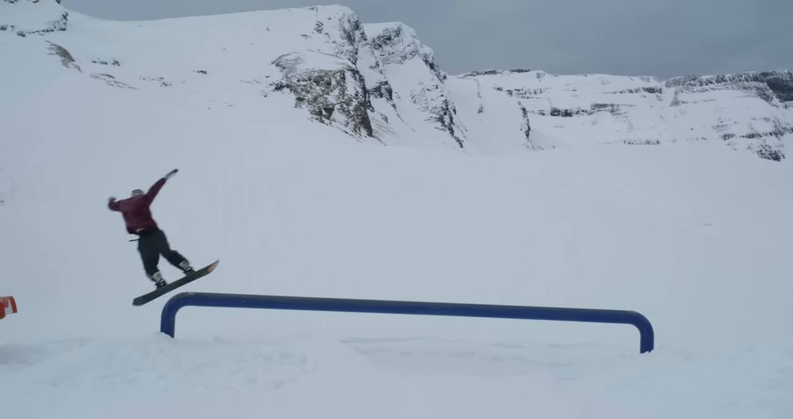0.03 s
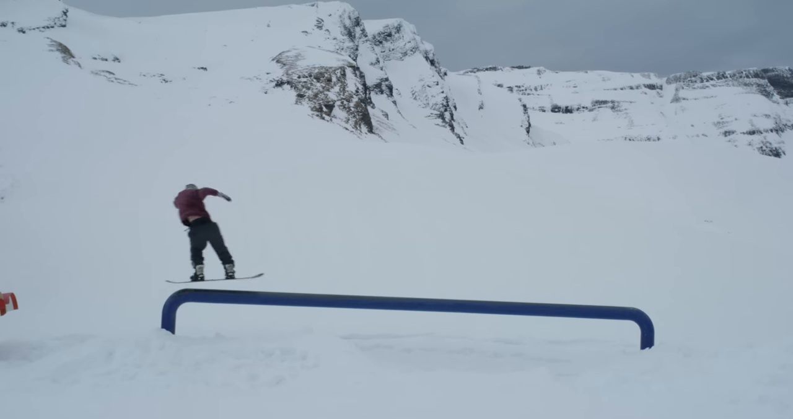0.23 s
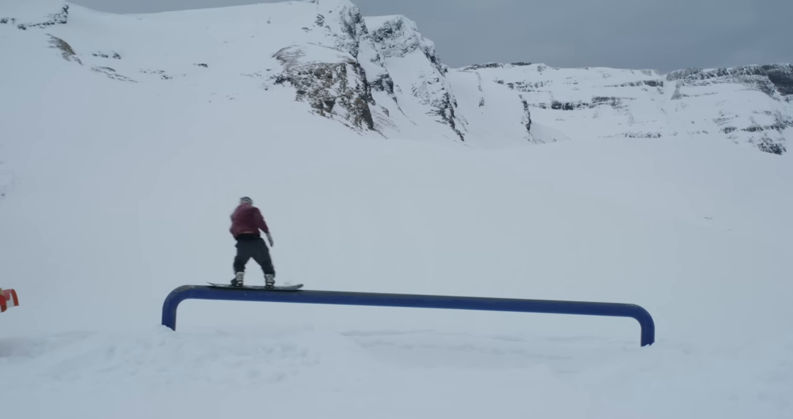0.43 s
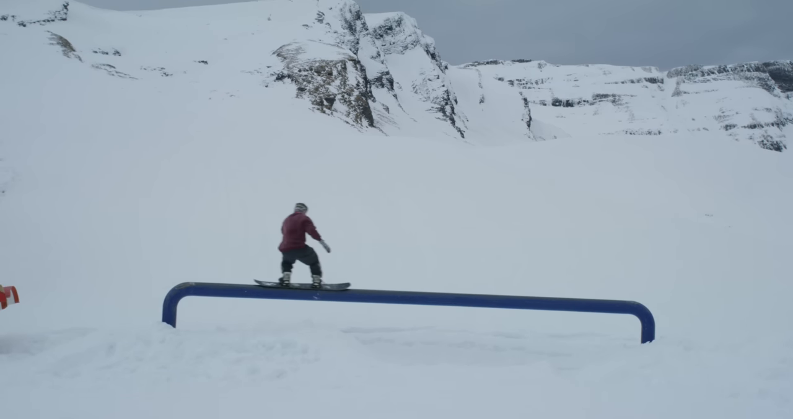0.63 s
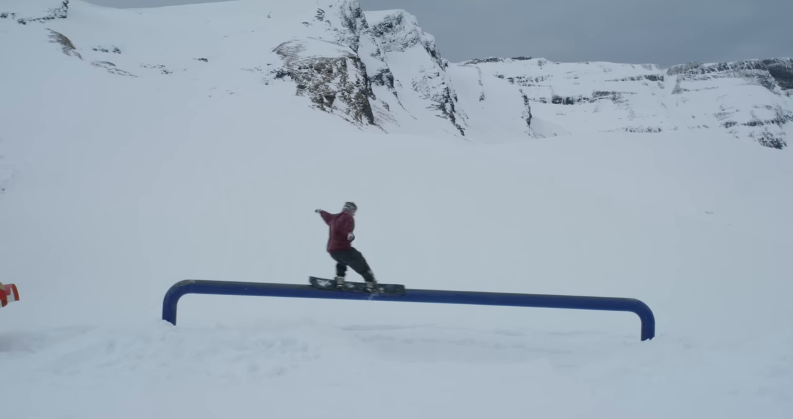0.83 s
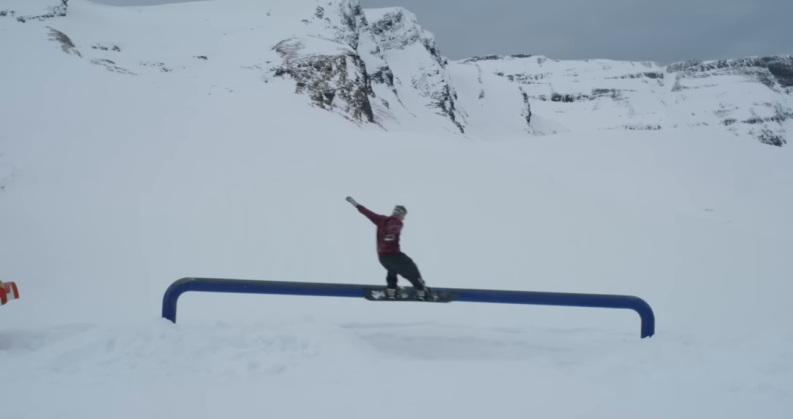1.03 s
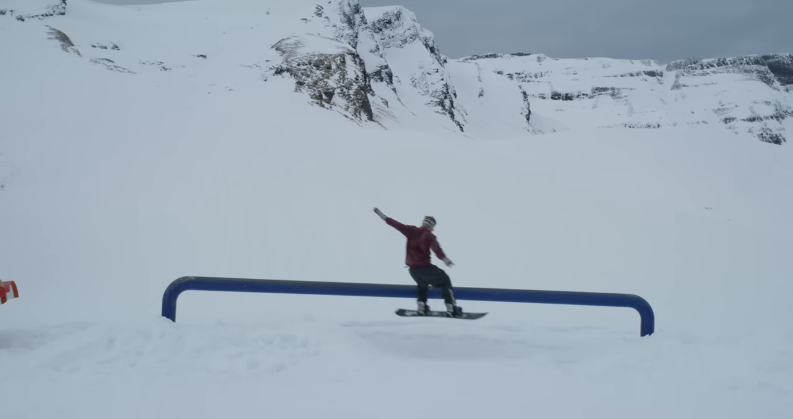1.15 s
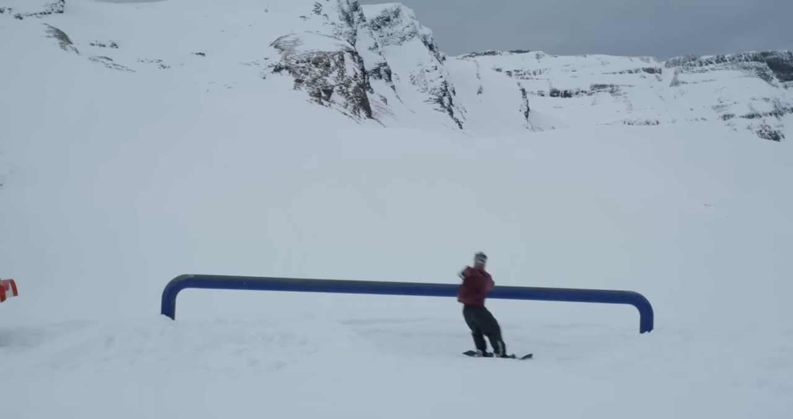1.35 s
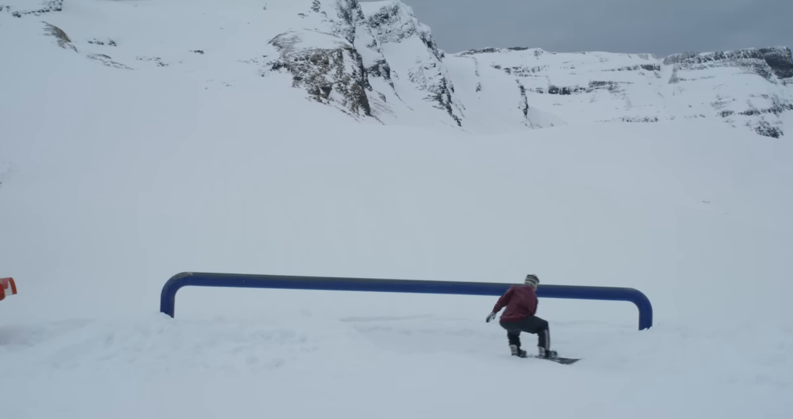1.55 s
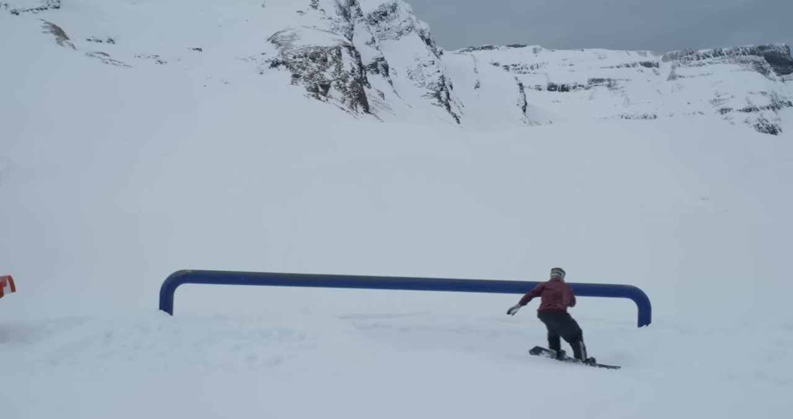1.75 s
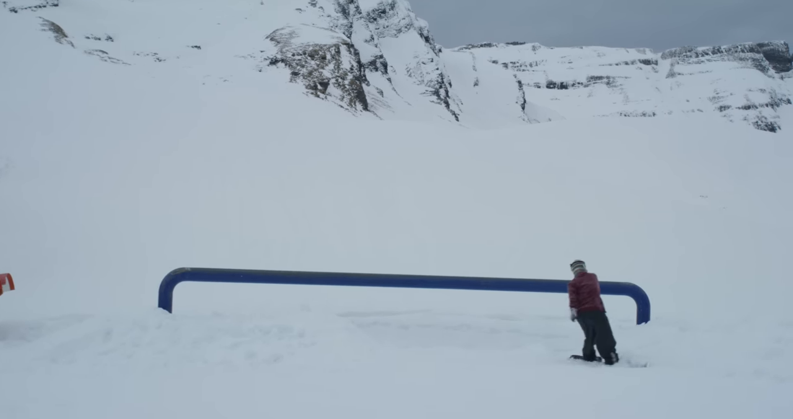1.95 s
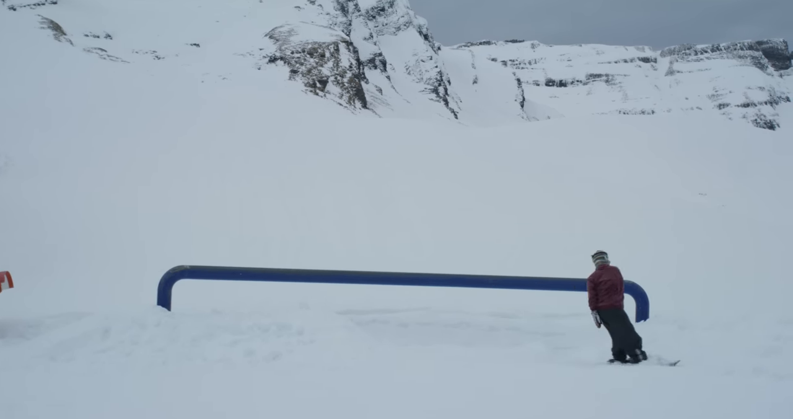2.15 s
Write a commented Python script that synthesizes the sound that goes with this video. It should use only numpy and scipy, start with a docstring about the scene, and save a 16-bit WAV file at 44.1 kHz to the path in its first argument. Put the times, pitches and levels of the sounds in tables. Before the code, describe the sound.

Hard metallic clank of a snowboard hitting a pipe rail, brief scrape, crunchy snow landing, low wind rumble

```python
"""Wind rumbles on the microphone throughout, as shaped noise with gusts, deep buffets and a faint hiss.
A snowboard clips a steel pipe rail and slams onto it: its modes clack, noise cracks and an echo returns.
The pipe rings in tones that bloom late, sink slightly in pitch and beat; the base slaps down and scrapes along.
The edge scuffs off the rail's end in bursts of grains, then the board lands and glides away
in crunching, spraying snow made of dense clicks."""
import sys
import numpy as np
from scipy import signal
from scipy.fft import rfft, irfft
from scipy.io import wavfile
from scipy.ndimage import uniform_filter1d

SR = 44100
rng = np.random.default_rng(int(sys.argv[2]) if len(sys.argv) > 2 else 0)


def digitize_waveform(pressure):
    """Quantize a signal to 16-bit integers and store it at the path in sys.argv[1].

    Rows of a 2-D input are taken as channels; values are limited to [-1, 1].
    """
    field = np.atleast_2d(pressure).T
    bounded = np.clip(field, -1, 1)
    quanta = np.round(bounded * 32767).astype(np.int16)
    wavfile.write(sys.argv[1], SR, quanta)


N = 97020

# blows of board on rail: t/s, relative clack level/dB, relative crack level/dB
BLOWS = [(0.3753, -15.5, -8), (0.3782, -15, -19), (.3877, -34, -11), (0.4273, -11, -38), (0.431, -5, 5),
         (0.4373, 2.5, 2.5), (0.4426, -8, 7.5), (0.4738, -15, -11.5), (.6, -40, -23.5)]


def undb(db):
    """Decibels to gain."""
    return 10 ** (np.asarray(db) / 20)


def clock():
    """Time of every sample in seconds."""
    return np.arange(N) / SR


def curve(rows, axis=1):
    """Gain from one dB column of a time table, silent outside it."""
    rows = np.array(rows)
    level_db = np.interp(clock(), rows[:, 0], rows[:, axis], left=-np.inf, right=-np.inf)
    return undb(level_db)


def fade(t60):
    """Exponential decay that falls 60 dB in t60 seconds."""
    return np.exp(-np.log(1000) * clock() / max(t60, 1e-3))


def delay(x, s):
    """The same sound s seconds later."""
    silence = np.zeros(max(int(s * SR), 0))
    return np.concatenate([silence, x])[:N]


def ring(x, response):
    """Play a drive through a response."""
    return signal.fftconvolve(x, response)[:N]


def colour(x, points):
    """Causal minimum-phase filter of unit power that follows (f/Hz, level/dB) points."""
    hz, db = np.array(points).T
    size = 8192
    bin_hz = np.arange(size // 2 + 1) * SR / size
    gain = undb(np.interp(np.log(bin_hz + 1), np.log(hz), db))
    # fold the cepstrum forward in time so that the response starts at once
    cepstrum = irfft(np.log(gain))
    cepstrum[1:size // 2] *= 2
    cepstrum[size // 2 + 1:] = 0
    response = irfft(np.exp(rfft(cepstrum)))
    return ring(x, response / np.linalg.norm(response))


def walk(rate):
    """Smoothed noise with a spread of 1; a higher rate in Hz wanders faster."""
    width = max(int(SR / rate), 1)
    smooth = uniform_filter1d(rng.standard_normal(N), width)
    smooth = uniform_filter1d(smooth, width)
    return smooth / smooth.std()


def grains(rate, spread_db):
    """Random clicks of uneven size, about rate per second, scaled to a spread of 1."""
    hits = rng.random(N) < rate / SR
    sizes = rng.standard_normal(N)
    boost = undb(spread_db * np.minimum(rng.exponential(size=N), 5))
    clicks = hits * sizes * boost
    return clicks / clicks.std()


def wind():
    """Gusts and deep buffets press on the microphone as low noise, over a faint steady hiss."""
    # wind strength: t/s, level/dB
    gusts = [(0, -46.5), (.205, -46), (.235, -38), (.28, -37.5), (.4, -39.5), (.5, -41.5), (.61, -45),
             (.75, -53), (.87, -52.5), (1.05, -49), (1.25, -44), (1.45, -44), (1.6, -39.5), (1.85, -43.5),
             (2.12, -44), (2.2, -46)]
    # spectrum of the rumble: f/Hz, relative level/dB
    rumble_colour = [(15, -10.5), (30, -13), (65, -2), (130, -3), (210, -9.5), (320, -18.5), (500, -26.5),
                     (1000, -47), (3000, -79)]
    # single deep buffets: t/s, level/dB
    buffet_peaks = [(.245, -32), (.605, -42.5), (.69, -45), (0.811, -45.5), (1.35, -41)]
    # spectrum of a buffet: f/Hz, relative level/dB
    buffet_colour = [(15, -22), (40, -5), (75, 3.5), (120, -14), (250, -42), (600, -71)]
    # spectrum of the hiss: f/Hz, relative level/dB
    hiss_colour = [(300, -5), (1000, 5), (2500, -5), (6000, -11.5), (9800, -16), (11100, -7.5),
                   (12300, -13), (15500, -9.5)]
    buffet_s, hiss_db = 0.02, -70  # buffet half-width at 1/e, hiss level

    flutter = undb(1.1 * walk(rate=31))
    rumble = curve(gusts) * flutter * colour(rng.standard_normal(N), rumble_colour)
    swell = sum(undb(db) * np.exp(-((clock() - s) / buffet_s) ** 2) for s, db in buffet_peaks)
    buffets = swell * colour(rng.standard_normal(N), buffet_colour)
    hiss = undb(hiss_db) * colour(rng.standard_normal(N), hiss_colour)
    return rumble + buffets + hiss


def snow():
    """Packed snow crunches under the landing in dense clicks; the edge throws a finer, brighter spray."""
    # board in snow: t/s, crunch level/dB, spray level/dB
    contact = [(1.368, -69.5, -86), (1.382, -48, -64), (1.41, -48.5, -64), (1.44, -51.5, -62),
               (1.47, -57, -66.5), (1.51, -55.5, -64.5), (1.63, -57, -68), (1.69, -55, -68.5),
               (1.76, -57.5, -72), (1.92, -56, -60.5), (2.04, -62, -62.5), (2.1, -62.5, -66),
               (2.2, -62, -70.5)]
    # spectrum of the crunch: f/Hz, relative level/dB
    crunch_colour = [(200, 5), (500, 1), (1200, -8), (2400, -7), (3600, -0.5), (4600, -18), (7000, -18),
                     (10000, -38), (15500, -34)]
    # spectrum of the spray: f/Hz, relative level/dB
    spray_colour = [(1000, -17), (3500, 2.5), (5000, 0.5), (8000, -1.5), (11500, -6.5), (15500, -15.5)]

    crunch = curve(contact, axis=1) * colour(grains(rate=3500, spread_db=1.5), crunch_colour)
    spray = curve(contact, axis=2) * colour(grains(rate=20000, spread_db=0.0), spray_colour)
    return (crunch + spray) * undb(1.15 * walk(rate=52))


def scuffs():
    """The edge catches and rips out short bursts of bright grains."""
    # scuffs off the rail's end, then through crusts of snow: t/s, relative level/dB, t60/s
    catches = [(1.1005, -39.5, 0.057), (1.109, -43.5, 0.02), (1.185, -53, 0.013), (1.301, -59.5, 0.025),
               (1.409, -49.5, 0.047), (1.457, -53.5, 0.096), (1.677, -50.5, 0.027), (1.757, -54, 0.037),
               (1.917, -57.5, .05)]
    # spectrum of a scuff: f/Hz, relative level/dB
    scuff_colour = [(200, -20), (500, -5.5), (1200, 2), (2500, -3.5), (3500, -2.5), (4500, -14.5),
                    (6500, -9), (9000, -21.5), (15500, -22)]
    attack_s = 0.002  # time constant of the onset

    onset = 1 - np.exp(-clock() / attack_s)
    envelope = sum(undb(db) * delay(onset * fade(t60), s) for s, db, t60 in catches)
    return 2 * colour(envelope * grains(rate=12000, spread_db=1.0), scuff_colour)


def slide():
    """The base catches and slips on the steel in tiny uneven jerks."""
    # scrape of the base along the rail: t/s, level/dB
    friction = [(.44, -35), (.48, -48), (.63, -56), (.74, -52.5), (.82, -52.5), (.86, -49.5), (.925, -47.5),
                (.95, -58), (1.0, -61), (1.04, -61), (1.07, -52.5), (1.1, -54.5), (1.125, -59),
                (1.16, -69.5), (1.3, -65.5), (1.36, -91)]
    # spectrum of the scrape: f/Hz, relative level/dB
    scrape_colour = [(200, -12.5), (600, -7), (1400, 2), (2400, -6.5), (3600, -7), (4600, -17.5),
                     (6500, -17.5), (10000, -26.5), (15500, -39)]

    unevenness = undb(0.73 * walk(rate=70))
    return curve(friction) * unevenness * colour(grains(rate=7000, spread_db=0.5), scrape_colour)


def slap():
    """A dull, woody knock of decaying noise as the whole base comes down flat after the slam."""
    # spectrum of the slap: f/Hz, relative level/dB
    slap_colour = [(200, -21), (400, 8), (700, -12.5), (1000, 0.5), (1350, 6), (1950, -1.5), (2500, -11),
                   (4000, -14.5), (6000, -39), (15000, -45)]
    slap_s, slap_db, slap_t60_s = 0.5508, -27, 0.046

    burst = fade(slap_t60_s) * rng.standard_normal(N)
    return undb(slap_db) * colour(delay(burst, slap_s), slap_colour)


def pipe(scrape):
    """Waves near a wall mode travel slowest, so tones bloom late and sink; the routes waver and beat together."""
    # pitches that the wall modes sink to: f/Hz
    mode_hz = [640, 1175, 1892, 2782, 3810, 5200, 6300, 7750]
    # ring of each wall mode: relative level/dB, t60/s of its exponential part, sag/(Hz s^2), width/Hz
    modes = [(-14.5, 1.42, .6, 77), (-2, 2.215, .82, 38.7), (-13, 1.21, .35, 110), (-2.5, 0.41, 0.298, 64),
             (-12, 0.39, 0.38, 230), (-24, 0.39, .3, 260), (-26, 0.28, 0.27, 250), (-24.5, 0.32, 0.33, 230)]
    # routes to and fro along the pipe: length relative to the shortest, relative level/dB
    routes = [(1, 0), (1.44, -10), (1.83, -4.5), (2.8, -4), (6.5, -13)]
    # jolts that set the pipe ringing: t/s, relative level/dB, brightness/(dB per octave from 1 kHz)
    jolts = [(0.378, -28, 6), (.44, 0.5, 0), (0.553, -25, -1.5), (1.106, -21.5, 0)]
    ring_db, slide_ring_db = -35, -18  # whole ring, and the share driven by the scrape
    waver_us, waver_rate = 45, 45  # spread of the timing in microseconds, wander in Hz

    t = clock() + 1 / SR
    struck, response = np.zeros(N), np.zeros(N)
    for hz, (db, t60, sag, width_hz) in zip(mode_hz, modes):
        tone = np.zeros(N)
        for length, route_db in routes:
            # early waves lie far above the mode and are weak
            above_hz = sag * length ** 2 / t ** 2
            bloom = np.exp(-above_hz / width_hz)
            wavering = t + waver_us * 1e-6 * walk(rate=waver_rate)
            # as a phase, this minus sign makes a pitch that sinks to hz from above
            tone += undb(route_db) * bloom * np.sin(2 * np.pi * (hz - above_hz) * wavering)
        tone *= undb(db) * fade(t60) / np.sqrt(t)  # the wave also spreads out in time
        response += tone
        octaves = np.log2(hz / 1000)
        struck += sum(undb(jolt_db + bright_db * octaves) * delay(tone, s) for s, jolt_db, bright_db in jolts)
    scraped = undb(slide_ring_db) * ring(scrape, response)
    return undb(ring_db) * (struck + scraped)


def clack():
    """Each blow adds energy to the board's modes, which ring on as decaying sines."""
    # pitches of the board's modes: f/Hz
    mode_hz = [402, 570, 654, 725, 766, 812, 833, 883, 940, 1016, 1130, 1263, 1382, 1470, 1880, 2045, 2440,
               2797, 3026, 3178, 3590]
    # ring of each mode: relative level/dB, t60/s
    modes = [(-4.5, 0.084), (-11, 0.095), (-6, 0.06), (-6, .11), (-6.5, 0.1), (-7, 0.126), (-28, 0.44),
             (-4.5, .16), (-14, .16), (1, 0.12), (-10, 0.29), (-7.5, 0.25), (-11.5, .12), (-12, 0.34),
             (-7.5, 0.085), (-15, 0.1), (-2, 0.024), (-1, 0.033), (-7.5, 0.21), (-15, 0.043),
             (-25.5, 0.032)]
    clack_db = -23.5  # level of the whole clack

    body = np.zeros(N)
    for hz, (db, t60) in zip(mode_hz, modes):
        decay = fade(t60)
        energy = sum(delay((undb(blow_db) * decay) ** 2, s) for s, blow_db, _ in BLOWS)
        envelope = uniform_filter1d(np.sqrt(energy), size=24)  # soften the onsets
        body += undb(db) * envelope * np.sin(2 * np.pi * (hz * clock() + rng.random()))
    return undb(clack_db) * body


def crack():
    """Each blow bursts into short coloured noise with a quieter, longer tail."""
    # spectrum of the crack: f/Hz, relative level/dB
    crack_colour = [(150, -26.5), (350, -2), (900, 9), (1700, -4), (3300, -1.5), (4800, -19), (7200, -17.5),
                    (10000, -30), (15500, -39)]
    crack_db, crack_t60_s = -16.5, 0.018
    tail_db, tail_t60_s = -21.5, 0.28  # tail level relative to the crack

    shape = fade(crack_t60_s) + undb(tail_db) * fade(tail_t60_s)
    bursts = sum(undb(db) * delay(shape * rng.standard_normal(N), s) for s, _, db in BLOWS)
    return undb(crack_db) * colour(bursts, crack_colour)


def clank():
    """Clack and crack sound together, and the pipe's end sends them back duller and smeared."""
    echo_s, echo_db, echo_hz, echo_t60_s = 0.036, -11.5, 1600, 0.13  # delay, level, lowpass, smear

    direct = clack() + crack()
    dull = signal.sosfilt(signal.butter(2, echo_hz, fs=SR, output="sos"), direct)
    smear = fade(echo_t60_s) * rng.standard_normal(N)
    echo = ring(dull, smear / np.linalg.norm(smear))
    return direct + undb(echo_db) * delay(echo, echo_s)


def scene():
    """Blows and scrape both ring the pipe; snow and wind lie around them."""
    scrape = slide()
    surroundings = wind() + snow()
    board_on_rail = scuffs() + scrape + slap() + pipe(scrape) + clank()
    return (surroundings + board_on_rail)[None]


def record(dry):
    """The recorder rounds the tallest peaks and cuts the top."""
    ceiling, top_hz = 0.55, 16000  # full-scale fraction, cutoff in Hz
    rounded = dry / (1 + (dry / ceiling) ** 4) ** 0.25
    return signal.sosfilt(signal.ellip(10, 0.2, 70, top_hz, fs=SR, output="sos"), rounded)


dry = scene()
out = record(dry)
digitize_waveform(out)
```